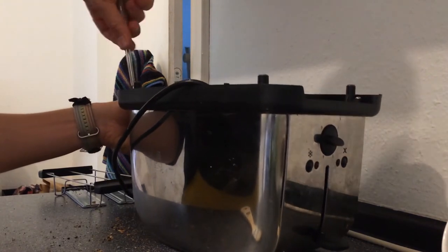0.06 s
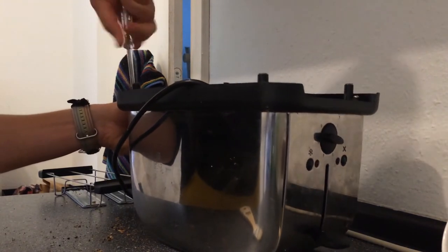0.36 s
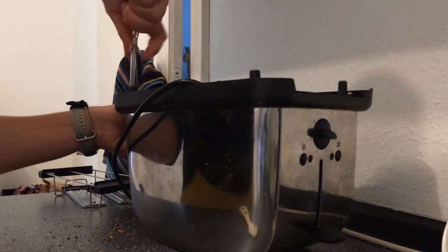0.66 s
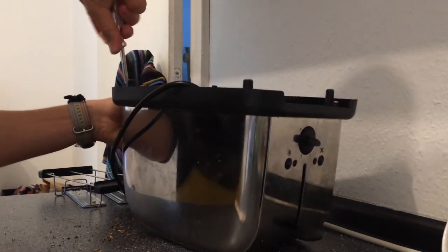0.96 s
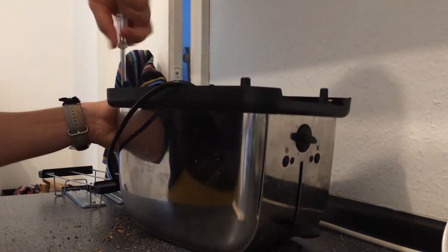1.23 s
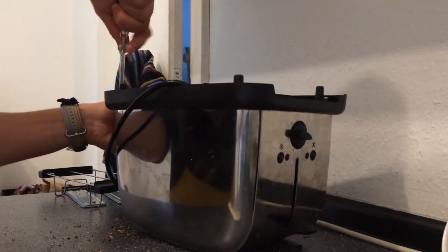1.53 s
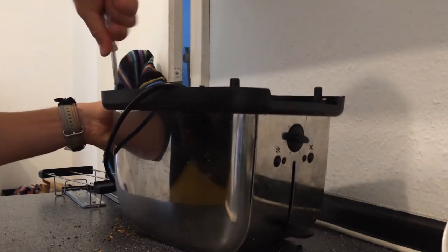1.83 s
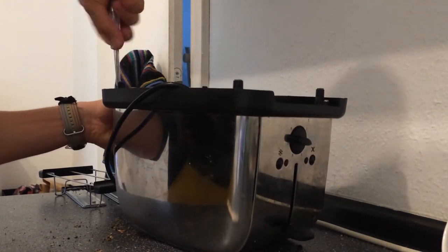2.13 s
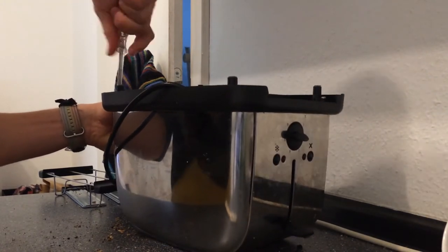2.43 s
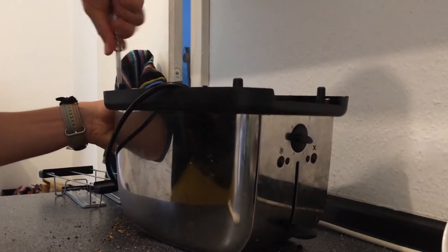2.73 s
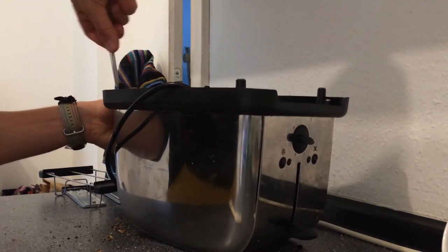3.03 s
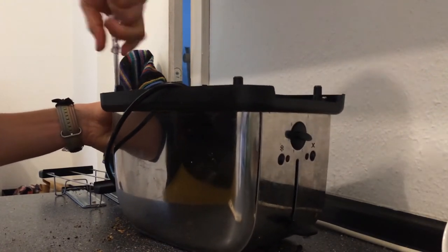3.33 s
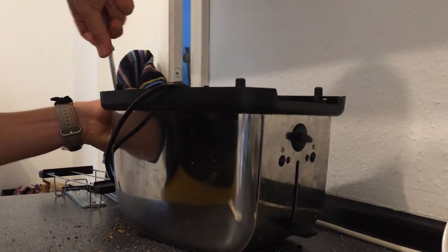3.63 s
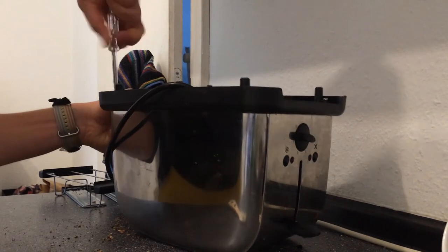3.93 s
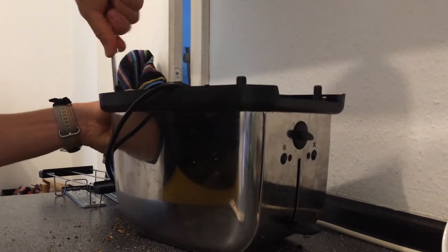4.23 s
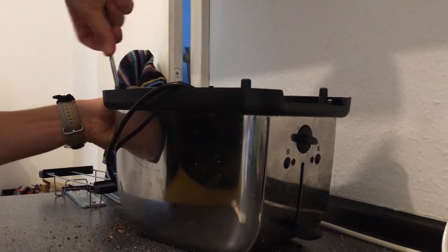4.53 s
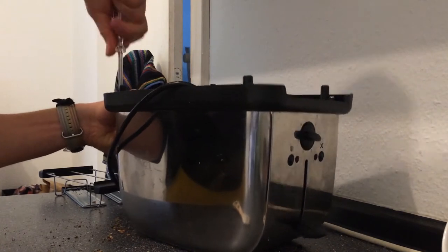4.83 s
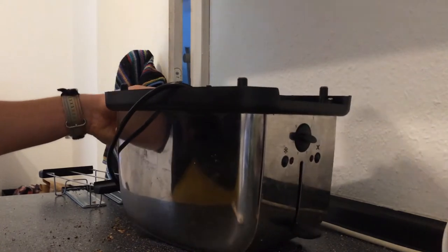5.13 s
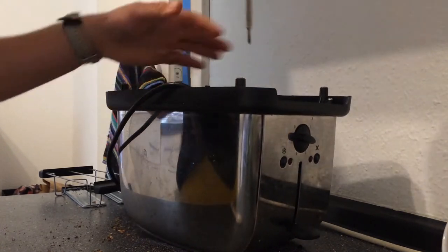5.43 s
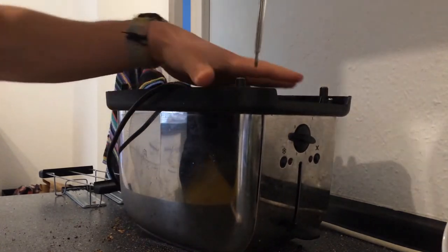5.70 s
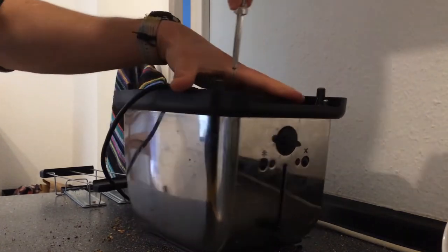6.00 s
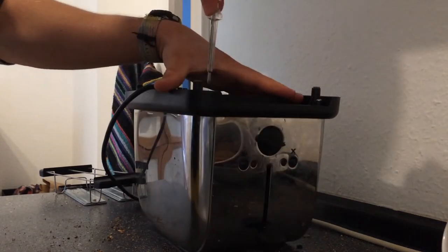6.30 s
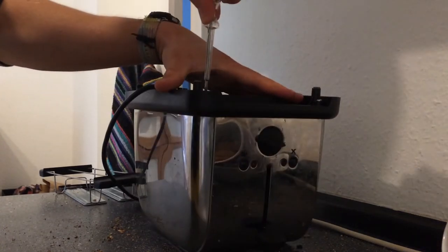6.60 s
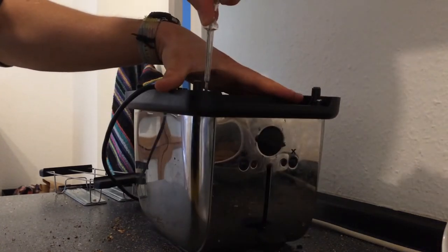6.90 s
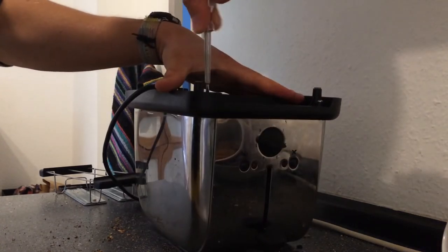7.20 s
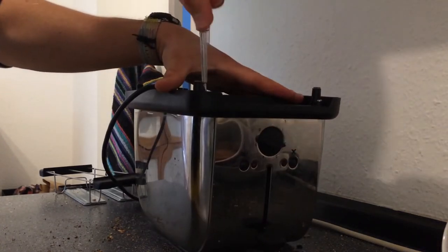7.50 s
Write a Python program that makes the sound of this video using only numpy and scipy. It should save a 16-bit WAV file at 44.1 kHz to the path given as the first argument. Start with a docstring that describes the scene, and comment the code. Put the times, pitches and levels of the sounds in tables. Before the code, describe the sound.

In a quiet small kitchen, a screwdriver tip catches and slips in a toaster's screws, making uneven metallic clicks and faint rasps. The toaster grates briefly on the counter and rocks under several sharp slips. Softer ticking follows, until a hard knock on the base and a quick squeaky slide of its feet. A few more ticks and taps finish over faint, low room noise.

```python
"""Screws in a toaster base.

An upturned toaster on a kitchen counter has the screws in its plastic base turned by hand.
The screwdriver tip ticks, rubs and slips in the screw heads; each contact rings the steel shell.
The toaster shifts and rocks under the pressure, is knocked once and is slid round on its feet,
which stick and slip. The small room adds a short tail."""
import sys
import numpy as np
from scipy import signal
from scipy.fft import rfft, irfft
from scipy.io import wavfile

SR = 44100
rng = np.random.default_rng(int(sys.argv[2]) if len(sys.argv) > 2 else 0)


def waveform_to_disk(signal):
    """Save audio, clipped to [-1, 1], as 16-bit WAV at the path in sys.argv[1]."""
    frames = np.transpose(np.atleast_2d(signal))
    scaled = np.clip(frames, -1, 1) * 32767
    samples = np.round(scaled).astype(np.int16)
    wavfile.write(sys.argv[1], SR, samples)


N = 341772

# Room background. Each row: frequency in Hz, density in dB.
AIR_SPECTRUM = [(25, -24.5), (45, -2), (59, -1), (90, -8), (160, -9.5), (300, -10.5), (700, -19),
                (1500, -22), (4000, -27), (8000, -28.5), (15000, -38)]
# Screwdriver turns and hand rubs. Each row: rough middle in seconds, length in seconds, effort in dB.
TURNS = [(0.3, 0.48, 0), (0.64, 0.52, -2), (1.135, 0.19, 6.5), (1.423, 0.2, 3.5), (1.745, 0.41, 4),
         (2.275, 0.18, -1), (2.451, 0.13, 6), (2.906, 0.26, -1), (3.27, 0.75, -6.5), (3.548, 0.062, 5),
         (3.858, 0.37, -7), (4.114, 0.17, -3), (4.494, 0.55, -5), (4.866, 0.24, 11), (5.008, 0.077, 14),
         (5.33, 0.32, -3.5), (5.847, 0.23, -9), (6.082, 0.12, 5.5), (7.377, 0.21, -3.5), (7.605, .3, -7.5),
         (7.74, 0.096, 1.5)]
# Factors on the effort in dB, for rumble, scuff and rasp.
EFFORT_FACTORS = [0.65, 0.97, 1.03]
# Hand rumble, tip scuff, tip rasp. Each row: frequency in Hz, density in dB.
RUMBLE_SPECTRUM = [(40, -14), (65, 5), (150, -2), (250, -17.5), (450, 2), (900, -21)]
SCUFF_SPECTRUM = [(200, -13), (450, 10), (700, -1.5), (1200, -3), (2000, -2), (4000, -25)]
RASP_SPECTRUM = [(800, -10), (2000, -1.5), (4000, 2.5), (8000, -3), (12000, 0.5), (16000, -2.5)]
# Housing resonances. Each row: frequency in Hz, width in Hz, gain in dB.
HOUSING_BANDS = [(148, 50, 7), (466, 110, -2.5), (677.6, 30, 6), (1045, 35, 1.5), (1262, 220, 4.5),
                 (2054, 380, -3), (2574, 490, 3), (4040, 920, 3.5), (5700, 170, 3), (8080, 1300, 3.5)]
# Steel shell. Each row: frequency in Hz, level in dB, T60 in seconds.
SHELL_MODES = [(155, 4.5, 0.16), (246, 2.5, 0.18), (355, 6, 0.28), (431, -9, 0.9), (692, 7, 0.17),
               (815, -4.5, 0.26), (959.4, 8, 0.15), (1028, 0, 0.18), (1119, 3, 0.055), (1322, -2, 0.11),
               (1447, 0, 0.14), (1570, 0.5, .2), (2225, 1, 0.14), (2497, 4.5, 0.13), (2712, 3, 0.18),
               (3356, 1, 0.11), (3670, 4.5, 0.15), (5940, 2.5, 0.052), (7330, 0.5, 0.059),
               (8620, 0.5, 0.14), (8500, -5.5, .1), (9800, -3, 0.09), (11350, -5, 0.17)]
# The tip catches in a screw. Each row: release in seconds, level in dB, brightness in dB per octave,
# thud in dB, grating rise in seconds (0 for a clean click).
TIP_CATCHES = [(0.2797, -41, 1.5, -57.5, 0.012), (0.386, -50, 6, -82, 0), (0.497, -59, 5.5, -65, 0),
               (0.534, -53.5, -1.5, -78, 0.012), (0.857, -34, 5, -65, 0.0045),
               (0.933, -37.5, -4, -48, 0.012), (0.9432, -28.5, 1, -35, 0.011),
               (0.9974, -29, 3, -42, 0.0067), (1.0495, -32.5, -0.7, -54.5, 0.028),
               (1.0821, -35.5, -3, -59, 0.02), (1.136, -38, 1, -49, 0), (1.155, -39, 1, -60, 0.01),
               (1.1998, -44, 2, -68, 0.0041), (1.217, -40.5, 1.2, -72, 0.019),
               (1.237, -42, -.8, -53.5, 0.0079), (1.3249, -53, -7, -52, 0.027),
               (1.3713, -52, 2.5, -71, 0.0019), (1.457, -62.5, 10.5, -58, 0.0036),
               (1.5652, -51.5, 0, -57, 0.0075), (1.665, -45.5, -1.5, -53.5, 0.0082),
               (1.729, -52, -2, -78, 0.015), (1.7546, -52.5, -6.5, -55, 0),
               (1.814, -15.5, 0.1, -28.5, 0.014), (1.9796, -36.5, 4.5, -49, 0.012),
               (2.0037, -21, 0.5, -40.5, 0.007), (2.0333, -23.5, 1.5, -58, 0.0069),
               (2.422, -55, 7.5, -81, 0), (2.4965, -35.5, 3.5, -59, .013),
               (2.5368, -22.5, 1.9, -39.5, 0.0081), (2.9462, -47, -3, -68, 0),
               (3.026, -60, -2.5, -57, 0.02), (3.2893, -59.5, -8, -51, 0.019), (3.3164, -46.5, 1, -73, 0),
               (3.333, -49.5, 8, -57.5, 0.017), (3.4326, -41, -4, -49, 0.0065),
               (3.5733, -41.5, 2, -57.5, 0.0051), (3.7968, -54.5, -8.5, -54, 0.016),
               (3.834, -52, -4.5, -55, 0.017), (3.9511, -34.5, 0.3, -40.5, 0.0061),
               (4.124, -49, 4, -85, 0.009), (4.1859, -52.5, 1.5, -59, 0.016), (4.3531, -54, 8.5, -54.5, 0),
               (4.389, -49, 1.5, -73, 0.012), (4.8925, -26, -0.1, -45.5, 0.0036),
               (4.9, -35.5, -1, -61, 0.019), (5.262, -59.5, 8, -50, 0.017),
               (5.3595, -52, -1.5, -57, 0.0086), (6.2457, -37.5, -1.5, -50, 0), (6.2535, -49.5, -8, -53, 0),
               (6.351, -46, -5, -50.5, .005), (6.716, -45.5, -2, -50, 0), (6.756, -59, -5.5, -55, 0),
               (6.79, -51, 1.5, -53.5, 0), (6.8681, -52, -1.5, -57, 0.0031),
               (6.915, -52.5, -1, -55.5, 0.011), (6.999, -49.5, 3.5, -80.5, 0.0065),
               (7.017, -41, -2.5, -40.5, 0.0031), (7.1793, -30, 1.2, -37.5, 0.008),
               (7.3077, -53, 5.5, -77, 0), (7.3484, -51, -4.2, -50, 0.0029), (7.4678, -57, -2, -84, 0.0054),
               (7.627, -64, -7.5, -57.5, 0.01)]
# Thud, clack, snap and tick. Each row: low edge in Hz, high edge in Hz.
CATCH_BANDS = [(70, 620), (620, 2000), (2000, 7500), (7500, 16000)]
# T60 in seconds for each of those bands; low waves linger.
CATCH_T60_S = [.088, 0.087, 0.06, 0.051]
# The base gives most in the bass. Each row: frequency in Hz, gain in dB.
THUD_SPECTRUM = [(90, -1), (150, 2.5), (280, 1), (480, -4), (620, -4)]
# Tip landings, then pushes that rock the toaster. Each row: start in seconds, level in dB, centre in Hz.
TIP_TAPS = [(.596, -59, 810), (1.45, -59, 810), (1.817, -40, 1060), (2.004, -36, 940), (2.034, -36.5, 2580),
            (2.32, -60.5, 750), (2.415, -63, 1160), (2.537, -44, 940), (3.436, -55, 636),
            (3.952, -59, 2590), (4.59, -61, 686), (4.893, -53.5, 727), (7.179, -55.5, 2750)]
PUSHES = [(0.906, -31.5, 154), (0.974, -34, 207), (1.812, -40, 104), (1.852, -34, 63), (1.87, -36, 162),
          (2.005, -37, 169.5), (2.08, -40, 156), (2.325, -47.5, 160), (2.9, -46, 63.7), (2.967, -45.5, 153),
          (3.265, -47, 154), (3.436, -36, 80), (3.817, -43, 158), (4.786, -43, 170), (4.944, -39, 156),
          (7.178, -43, 127)]
# Grating on the counter. Each row: frequency in Hz, density in dB.
SHIFT_SPECTRUM = [(29, -51), (60, -13.5), (146, -9), (362, -12), (471, -10.5), (674, -6.5), (759, -40),
                  (1010, -10), (1840, -15.5), (4130, -21), (15000, -27)]
# Whole toaster on its feet. Each row: frequency in Hz, level in dB, T60 in seconds.
ROCKING_MODES = [(64.4, -2.5, .36), (75.4, 2.5, 0.076), (105, 6, 0.22), (156.8, 2, 0.12), (198.6, -1, 0.31)]
# A touch, then a hard knock. Each row: start in seconds, level in dB.
PANEL_BLOWS = [(5.0065, -50.5), (5.0157, -31)]
# Base panel, ringing and heavily damped modes. Each row: frequency in Hz, level in dB, T60 in seconds.
PANEL_MODES = [(145, 3, 0.21), (295, 1, 0.076), (390, -3, 0.16), (440, -6, 0.33), (1160, -13, 0.223),
               (1370, -6, 0.12), (1510, -22, 0.17), (1545, 7, 0.098), (1680, 3.5, 0.063), (2460, -13, .13),
               (3020, 2.5, 0.083), (3015, -7, 0.093), (3280, -21.5, 0.082)]
CRACK_MODES = [(222, 5, 0.01), (1480, 18.5, 0.0093), (2685, 16.5, 0.017), (3100, 19, 0.013)]
# The slide. Each row: time in seconds, speed from 0 to 1.
SLIDE_SPEED = [(5.948, 0.07), (6.041, 0.55), (6.14, 0.59), (6.2, 0.89), (6.253, 0.98), (6.285, .8),
               (6.323, .92), (6.37, .76), (6.42, 0)]
# Squeal of the feet. Each row: frequency in Hz, width in Hz, level in dB.
SQUEAL_BANDS = [(1080, 36, -5), (1570, 95, 3.5), (1974, 100, 1.5), (2510, 300, -8.5), (3050, 100, -6.5)]
# Scrape of the feet. Each row: frequency in Hz, density in dB.
SCRAPE_SPECTRUM = [(200, 4), (600, -1), (1200, 3), (2200, -7), (4000, -5.5), (8000, -13), (15000, -19)]
# Kitchen decay. Each row: frequency in Hz, T60 in seconds.
REVERB_T60_S = [(100, 0.8), (1000, 0.44), (4000, 0.33), (8000, 0.38), (15000, 0.4)]
# Kitchen reverberation. Each row: frequency in Hz, level in dB.
REVERB_DB = [(100, -12.5), (400, -7.5), (1200, -4.5), (4000, -11), (8000, -13.5), (15000, -14)]

CUTOFF_HZ = 15500
TIME_S, BINS_HZ = np.arange(N) / SR, np.fft.rfftfreq(N, 1 / SR)


def from_db(db):
    """Decibels to gain."""
    return 10 ** (np.asarray(db) / 20)


def unit_rms(x):
    """Scale to unit power."""
    return x / np.sqrt(np.mean(x ** 2) + 1e-20)


def at_hz(points, hz):
    """Interpolate on a log-frequency axis."""
    points_hz, values = np.transpose(points)
    return np.interp(np.log(np.maximum(hz, 1)), np.log(points_hz), values)


def band(x, low_hz, high_hz, order=2):
    """Butterworth band-pass."""
    sos = signal.butter(order, [low_hz, high_hz], "band", fs=SR, output="sos")
    return signal.sosfilt(sos, x + 1e-18)


def colour(x, spectrum):
    """Filter by a spectrum; unit power."""
    return unit_rms(irfft(rfft(x) * from_db(at_hz(spectrum, BINS_HZ)), N))


def resonance(x, hz, width_hz):
    """Two-pole resonance, unit peak gain."""
    r = np.exp(-np.pi * width_hz / SR)
    poles = [1, -2 * r * np.cos(2 * np.pi * hz / SR), r * r]
    return signal.lfilter(np.array([1, 0, -1]) * (1 - r * r) / 2, poles, x + 1e-18)


def ring(clicks, hz, t60_s):
    """A unit click starts a decaying unit sine."""
    r, w = from_db(-60 / (t60_s * SR)), 2 * np.pi * hz / SR
    return signal.lfilter([0, np.sin(w)], [1, -2 * r * np.cos(w), r * r], clicks + 1e-18)


def drift(rate_hz):
    """Slow random wander, unit spread."""
    r = np.exp(-80 * np.pi * rate_hz / SR)
    slow = signal.lfilter([1], [1, -2 * r, r * r], rng.standard_normal(N // 40 + 2002))[2000:]
    return np.interp(np.arange(N) / 40, np.arange(len(slow)), unit_rms(slow))


def friction(slips_per_s, spread_db, t60_s):
    """Tiny uneven slips, each a noise burst; unit power."""
    onsets = rng.random(N) < slips_per_s / SR
    sizes = from_db(spread_db * np.minimum(rng.exponential(1, N), 4))
    power = signal.lfilter([1], [1, -from_db(-120 / (t60_s * SR))], onsets * sizes ** 2 + 1e-18)
    return unit_rms(np.sqrt(power) * rng.standard_normal(N))


def impulses(blows):
    """One click per blow."""
    clicks = np.zeros(N)
    for start_s, db in blows:
        clicks[round(start_s * SR)] += from_db(db)
    return clicks


def swell(start_s, attack_s, hold_s, release_s):
    """Linear rise, hold and fall."""
    return np.interp(TIME_S, start_s + np.cumsum([0, attack_s, hold_s, release_s]), [0, 1, 1, 0])


def struck(hits, modes, width_octaves):
    """Each hit rings the modes near its centre most."""
    out = np.zeros(N)
    for k, (hz, mode_db, t60_s) in enumerate(modes):
        clicks = impulses([(start_s, db - 20 * np.log10(1 + (np.log2(hz / centre) / width_octaves) ** 4))
                           for start_s, db, centre in hits])
        out += (-1) ** k * from_db(mode_db) * ring(clicks, hz, t60_s)
    return out


def room_air(level_db):
    """Steady, bass-heavy background noise."""
    return from_db(level_db) * colour(rng.standard_normal(N), AIR_SPECTRUM)


def rubbing(rumble_db, scuff_db, rasp_db):
    """Each turn swells and fades: hands rumble on the housing, the tip scuffs and rasps in the screw."""
    power = np.zeros((3, N))
    for middle_s, length_s, effort_db in TURNS:
        span = slice(*np.searchsorted(TIME_S, [middle_s - 0.58 * length_s, middle_s + 0.55 * length_s]))
        gains = from_db(effort_db * np.array(EFFORT_FACTORS))
        power[:, span] += gains[:, None] ** 2 * np.hanning(len(TIME_S[span]))
    rumble = from_db(rumble_db) * colour(housing(rng.standard_normal(N)), RUMBLE_SPECTRUM)
    scuff_slips = friction(slips_per_s=160, spread_db=2, t60_s=0.064)
    scuff = from_db(scuff_db) * colour(housing(scuff_slips), SCUFF_SPECTRUM)
    spurts = from_db(rasp_db + 2.6 * drift(rate_hz=25) + 3 * drift(rate_hz=5.6))
    rasp_slips = friction(slips_per_s=260, spread_db=5, t60_s=0.079)
    rasp = spurts * colour(housing(rasp_slips), RASP_SPECTRUM)
    return np.sum(np.sqrt(power) * [rumble, scuff, rasp], axis=0)


def housing(x):
    """The hollow housing lifts some bands and dips others."""
    return x + sum((from_db(db) - 1) * resonance(x, hz, width_hz) for hz, width_hz, db in HOUSING_BANDS)


def shell(x, ring_db, t60_factor=0.73):
    """Vibration excites the shell modes, damped by the holding hand."""
    modes = sum(from_db(db) * resonance(x, hz, np.log(1000) / (np.pi * t60_s * t60_factor))
                for hz, db, t60_s in SHELL_MODES)
    return x + from_db(ring_db) * modes


def spot_noise(size, depth_db, spacing_hz):
    """Noise with random peaks and dips: each spot on the base has its own resonances."""
    hz = np.fft.rfftfreq(size, 1 / SR)
    place = np.log1p(hz / 2500) * 2500 / spacing_hz   # peaks spread out in the treble
    ripple = np.interp(place, np.arange(200), rng.uniform(-1, 1, 200))
    return irfft(rfft(rng.standard_normal(size)) * from_db(depth_db * ripple), size)


def tip_catches(band_db, grate_db, full_grate_s, pivot_hz, min_rise_s=0.0003):
    """The grip grates, lets go and scatters through the base as a dense burst over a low thud."""
    lead, size = SR // 20, 8192
    t, hz = (np.arange(size) - lead) / SR, np.fft.rfftfreq(size, 1 / SR)
    octaves = np.log2(np.sqrt(np.prod(CATCH_BANDS[1:], axis=1)) / pivot_hz)
    drives = np.zeros((len(CATCH_BANDS), N + size))
    for release_s, db, db_per_octave, thud_db, grate_s in TIP_CATCHES:
        grain = spot_noise(size, depth_db=9, spacing_hz=109.74)
        start = round(release_s * SR) - lead
        gains = from_db(np.r_[thud_db, db + db_per_octave * octaves] + band_db)
        rise_s = max(grate_s, min_rise_s)
        strain = np.sqrt(rise_s / full_grate_s)   # a longer grip grates louder
        grating = from_db(grate_db) * strain * np.exp(-np.abs(t) / rise_s) * (t > -1.35 * rise_s)
        for k, (low_hz, high_hz) in enumerate(CATCH_BANDS):
            envelope = np.where(t < 0, grating, from_db(-60 * np.abs(t) / CATCH_T60_S[k]))
            burst = envelope * grain
            band_energy = np.mean(np.abs(rfft(burst)) ** 2 * ((hz > low_hz) & (hz < high_hz)))
            drives[k, start:start + size] += gains[k] * burst * np.sqrt(sum(envelope ** 2) / band_energy)
    drives = drives[:, :N]
    drives[0] = irfft(rfft(drives[0]) * from_db(at_hz(THUD_SPECTRUM, BINS_HZ)), N)
    return housing(sum(band(drive, *edges_hz, order=3) for drive, edges_hz in zip(drives, CATCH_BANDS)))


def tip_taps():
    """The tip lands on a screw and pings the steel."""
    return struck(TIP_TAPS, SHELL_MODES, width_octaves=0.7)


def shifting(level_db):
    """The toaster grates on the counter as it gives way."""
    envelope = swell(start_s=0.79, attack_s=0.215, hold_s=0.04, release_s=0.026)
    slips = friction(slips_per_s=400, spread_db=0.9, t60_s=0.13)
    return from_db(level_db) * envelope * colour(housing(slips), SHIFT_SPECTRUM)


def rocking():
    """Pushes set the toaster rocking on its feet."""
    return struck(PUSHES, ROCKING_MODES, width_octaves=0.24)


def knock(snap_db, snap_t60_s):
    """A hard blow: a brief snap and a crack, then the base panel rings."""
    clicks, t = impulses(PANEL_BLOWS), TIME_S[:SR // 20]
    panel = sum((-1) ** k * from_db(db) * ring(clicks, hz, t60_s)
                for k, (hz, db, t60_s) in enumerate(PANEL_MODES + CRACK_MODES))
    noise = unit_rms(band(rng.standard_normal(len(t)), low_hz=2400, high_hz=7700))
    snap = noise * from_db(snap_db - 60 * t / snap_t60_s)
    return panel + signal.fftconvolve(clicks, snap)[:N]


def sliding(thrum_db, squeal_db, scrape_db, crawl_hz, rise_hz):
    """The feet scrape, stick and slip, quicker with speed: a low thrum, each slip exciting a squeal."""
    speed = np.interp(TIME_S, *np.transpose(SLIDE_SPEED), left=0, right=0)
    slip_hz = (crawl_hz + rise_hz * speed) * np.exp(0.12 * drift(rate_hz=59.7))
    cycles = np.cumsum(slip_hz) / SR
    thrum = unit_rms(np.sin(2 * np.pi * cycles) * from_db(2.4 * drift(rate_hz=24)))
    slips = unit_rms(np.diff(np.floor(cycles), prepend=0))
    grit = 6.2 * friction(slips_per_s=800, spread_db=4.5, t60_s=0.017)
    squeal = unit_rms(sum((-1) ** k * from_db(db) * resonance(slips + grit, hz, width_hz)
                          for k, (hz, width_hz, db) in enumerate(SQUEAL_BANDS)))
    scrape = colour(friction(slips_per_s=2600, spread_db=0.5, t60_s=0.029), SCRAPE_SPECTRUM)
    return (from_db(thrum_db) * speed ** 1.5 * thrum
            + from_db(squeal_db) * speed ** 5.5 * squeal
            + from_db(scrape_db) * speed ** 0.53 * scrape)


def tip_glide(start_s, level_db, start_hz, sag_hz_per_s, width_hz):
    """The tip glides to the next screw: light friction, a narrow hiss sinking in pitch."""
    hz = start_hz - sag_hz_per_s * (TIME_S - start_s)
    flutter = signal.sosfilt(signal.butter(2, width_hz / 2, fs=SR, output="sos"), rng.standard_normal(N))
    hiss = unit_rms(flutter * np.sin(2 * np.pi * np.cumsum(hz) / SR))
    return from_db(level_db) * swell(start_s, attack_s=0.27, hold_s=0.1, release_s=0.13) * hiss


def kitchen(x, build_s):
    """Diffuse reflections build up quickly and linger longest in the bass."""
    t, response = TIME_S[:SR], 0
    edges_hz = np.geomspace(40, 18000, 10)
    for low_hz, high_hz in zip(edges_hz, edges_hz[1:]):
        hz = np.sqrt(low_hz * high_hz)
        envelope = (1 - np.exp(-(t / build_s) ** 2)) * from_db(-60 * t / at_hz(REVERB_T60_S, hz))
        tail = band(envelope * rng.standard_normal(SR), low_hz, high_hz) / np.linalg.norm(envelope)
        response += from_db(at_hz(REVERB_DB, hz)) * tail
    return signal.fftconvolve(x, response)[:N]


def scene():
    """The toaster in the quiet kitchen; mono."""
    catches = tip_catches(band_db=[1, -6.5, -0.5, -4.5], grate_db=-7.5, full_grate_s=0.017, pivot_hz=3670)
    toaster = shell(catches, ring_db=-9) + tip_taps() + rocking()
    toaster += knock(snap_db=14, snap_t60_s=0.024)
    toaster += shell(rubbing(rumble_db=-62, scuff_db=-66, rasp_db=-61.5), ring_db=0)
    toaster += shell(shifting(level_db=-36), ring_db=-2)
    toaster += sliding(thrum_db=-46.5, squeal_db=-34.5, scrape_db=-49.5, crawl_hz=90, rise_hz=124.7)
    toaster += tip_glide(start_s=6.3, level_db=-68.5, start_hz=4650, sag_hz_per_s=1100, width_hz=500)
    return (toaster + room_air(level_db=-63) + kitchen(toaster, build_s=0.0029))[None]


def record(dry):
    """The microphone loses the deepest bass; the top is cut."""
    thin = signal.sosfilt(signal.butter(2, 42, "high", fs=SR, output="sos"), dry)
    return signal.sosfilt(signal.ellip(10, 0.2, 70, CUTOFF_HZ, fs=SR, output="sos"), thin)


dry = scene()
out = record(dry)
waveform_to_disk(out)
```